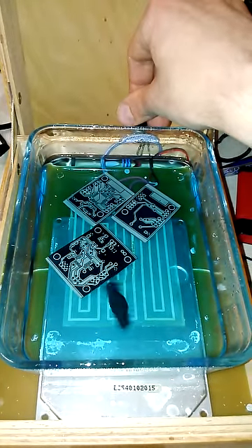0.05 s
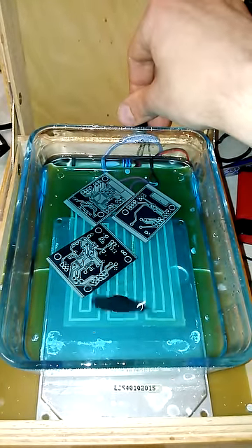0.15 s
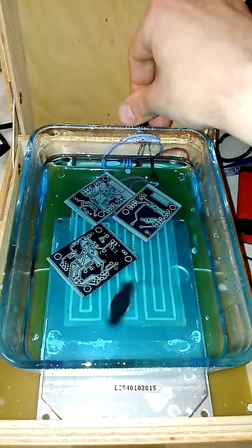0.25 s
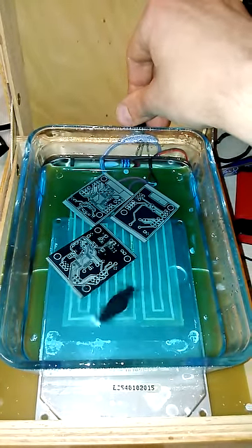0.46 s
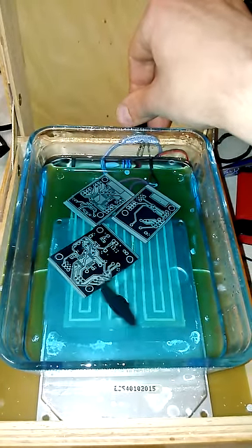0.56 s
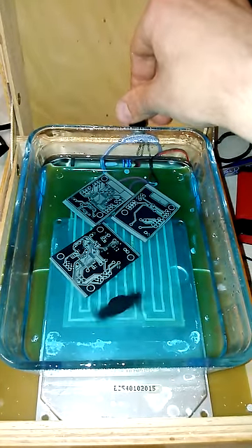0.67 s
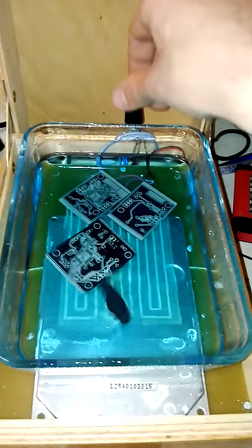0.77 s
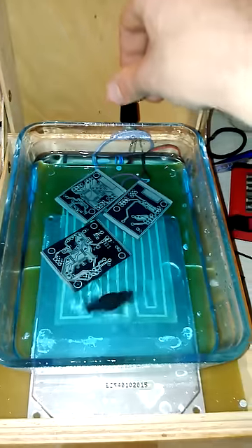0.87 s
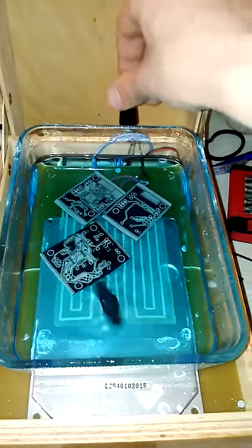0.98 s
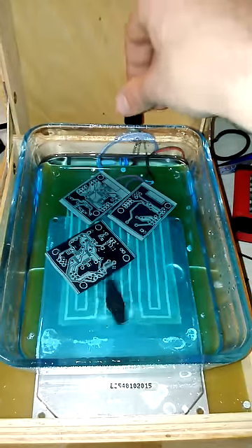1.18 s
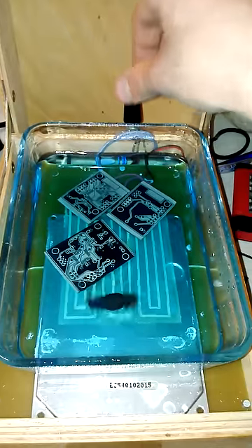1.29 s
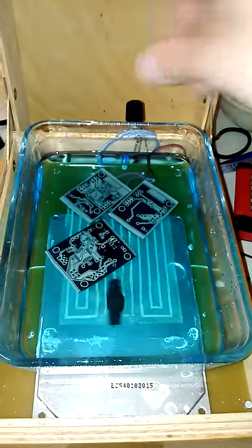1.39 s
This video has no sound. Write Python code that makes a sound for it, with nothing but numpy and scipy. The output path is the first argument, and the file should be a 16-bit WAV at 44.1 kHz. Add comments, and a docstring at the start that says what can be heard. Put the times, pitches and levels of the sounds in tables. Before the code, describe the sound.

A small switch gives a bright, sharp click at 0.2 s, doubled almost instantly, with a brief hollow ring of wooden box and glass dish. A faint drip follows near 0.5 s, a soft dull double touch around 0.7 s, another tiny drip at 0.9 s. At 1.23 s a similar, slightly less bright double click. Quiet motor hum, uneven rumble and steady hiss continue throughout, close and almost mono.

```python
"""A small switch, worked by hand behind a glass dish of liquid in a wooden box, close to the microphone.
Each of its two sharp clicks is a flat-spectrum noise burst, coloured by the switch, that sounds twice
in quick succession; decaying sine modes and noise tails give the short hollow ring of the box.
Between the clicks come a soft bump of two dull noise touches and two faint drips of narrow noise.
Further back lie a low motor hum of wavering sines, a rumble and steady hiss, all almost mono."""
import sys
import numpy as np
from scipy import signal
from scipy.fft import rfft, irfft, next_fast_len
from scipy.io import wavfile
from scipy.ndimage import map_coordinates

SR = 44100
rng = np.random.default_rng(int(sys.argv[2]) if len(sys.argv) > 2 else 0)


def transcribe(signal):
    """Save signal, clipped to [-1, 1], as a 16-bit WAV file at the path in sys.argv[1]."""
    frames = np.atleast_2d(signal).T
    limited = np.clip(frames, -1, 1)
    pcm = np.round(limited * 32767).astype(np.int16)
    wavfile.write(sys.argv[1], SR, pcm)


N = 63945  # length in samples

# Background: lines of the motor hum [f/Hz, mean rms level/dB]
HUM_LINES = [(122.3, -61), (204.6, -73), (1050, -76.5)]
HUM_WAVER_DB, HUM_WAVER_RAD = 1, 0.3  # scale of the random waver in level and phase
# Colour of the hiss [f/Hz, relative level/dB]
HISS_COLOUR = [(80, -15.5), (140, 3), (175, -11.5), (275, -13), (400, -12), (534, -17.5), (637, -11),
               (871, -16.5), (1060, -18), (1400, -14.5), (1690, -20.5), (2300, -18.5), (3290, -22.5),
               (8500, -22), (9200, -16.5), (9800, -26.5), (10350, -16), (11000, -23.5), (15800, -24)]
HISS_DB = -56.5  # rms
# Colour of the low rumble [f/Hz, relative level/dB]
RUMBLE_COLOUR = [(15, -20), (35, 4.5), (60, -12), (100, -3), (150, -17), (260, -30)]
# Rise and fall of the rumble [t/s, rms level/dB]
RUMBLE_LEVELS = [(0.0, -62), (0.144, -73), (0.298, -55), (0.35, -63.5), (0.806, -59), (0.896, -66),
                 (0.98, -56.5), (1.058, -63.5), (1.44, -57.5), (1.45, -68)]

# Faint drips in the dish [t/s, f/Hz, level/dB]
DRIP_EVENTS = [(0.471, 2800, -49), (0.908, 2740, -47.5)]
DRIP_RISE_S, DRIP_T60_S, DRIP_HALF_WIDTH_HZ = 0.0017, 0.04, 260

# Soft touches of the hand on the box [t/s, level/dB]
TOUCH_EVENTS = [(0.664, -53.5), (0.693, -43)]
# Colour of a touch [f/Hz, relative level/dB]
TOUCH_COLOUR = [(150, -26), (390, -3), (520, -11), (660, 2.5), (810, -4), (930, -4), (1150, -11.5),
                (1400, -9), (2500, -22.5), (5000, -45)]
TOUCH_RISE_S, TOUCH_T60_S = 0.0082, 0.17

# Clicks of the switch [t/s, level/dB, length of the snap/s, extra level of the bright ring/dB]
CLICK_EVENTS = [(0.2153, -21, 0.003, 1), (1.2348, -22, 0.003, -6)]
REPEAT_S, REPEAT_DB = 0.0239, -3  # the second, like sounding of each click
# Colour of the snap [f/Hz, relative level/dB]
SNAP_COLOUR = [(200, -27.5), (700, -25), (1350, -11.5), (1800, -24), (2250, -20.5), (2700, -16),
               (3900, -18), (4500, -13), (4900, -5), (5400, -4), (6200, -19), (7600, -12.5), (9100, 1),
               (10900, 2.5), (12500, -9), (14000, -15), (15500, -8.5)]
SNAP_ATTACK_S, SNAP_T60_S = 0.0004, 0.009
BRIGHT_HZ, BRIGHT_WIDTH_HZ = 9820, 570  # the bright ring of the switch
# Modes of box and dish [f/Hz, mean level re click/dB, t60/s, delay/s]
BODY_MODES = [(318.2, -31, 0.39, 0.0075), (359.7, -32, 0.39, 0.0074), (405.2, -31, 0.31, 0.0049),
              (569.5, -32.5, 0.11, 0.016), (628.3, -22, 0.1, 0.017), (739.2, -24.5, 0.15, .005),
              (885, -14.5, 0.063, .003), (919.5, -10, 0.06, .011), (1177, -26.5, 0.045, 0.0051),
              (1413, -25, 0.079, 0.0074), (2206, -18.5, 0.031, 0.0014), (2647, -13, 0.036, 0)]
BODY_RISE_S = 0.0021
# Scattered answer of the near box walls: delay, level re click, decay
WALL_S, WALL_DB, WALL_T60_S = 0.0066, -3.5, 0.017
# Colour of the room tail [f/Hz, relative level/dB]
ROOM_COLOUR = [(150, -18), (300, -7.5), (900, 0.5), (1400, -3), (1800, -14), (2700, -6), (4000, -8.5),
               (5300, -8), (7000, -12.5), (9300, 4.5), (10800, 3), (13000, -8), (15500, -12.5)]
# Decay of the room tail [f/Hz, t60/s]
ROOM_DECAY = [(300, 0.5), (1000, 0.25), (4000, 0.18), (10000, 0.21)]
ROOM_DB, ROOM_RISE_S = -13.5, 0.00088

SIDE_DB = -36.5  # side level of the switch: the image is almost mono
TOP_HZ = 15800  # band limit of the recorder


def amp(db):
    """Decibels to gain."""
    return 10 ** (np.asarray(db) / 20)


def unit(x):
    """Scale to rms 1."""
    return x / np.sqrt(np.mean(x ** 2) + 1e-20)


def along(points, hz):
    """Read [f/Hz, value] points on a log frequency axis."""
    f, v = np.transpose(points)
    return np.interp(np.log(hz + 1), np.log(f + 1), v)


def clock(start=0):
    """Seconds since start, zero before it."""
    return np.maximum(np.arange(N) / SR - start, 0)


def filtered(x, response):
    """Multiply the spectrum of x by a response of frequency."""
    size = next_fast_len(N + SR // 2)  # padded so that tails do not wrap round
    hz = np.fft.rfftfreq(size, 1 / SR)
    return irfft(rfft(x, size) * response(hz), size)[..., :N]


def noise(colour):
    """Noise of rms 1 with the given colour."""
    white = rng.standard_normal(N)
    return unit(filtered(white, lambda hz: amp(along(colour, hz))))


def wobble(rate):
    """A smooth random curve with rate knots a second."""
    return map_coordinates(rng.standard_normal(256), [clock() * rate], mode="mirror")


def swell(t, rise, t60):
    """A rise multiplied by an exponential decay."""
    return (1 - np.exp(-t / rise)) * amp(-60 * t / t60)


def motor_hum():
    """Steady sine lines of a motor, each wavering slightly in level and phase."""
    t = clock()
    hum = np.zeros(N)
    for hz, db in HUM_LINES:
        level = amp(db + HUM_WAVER_DB * wobble(14.42)) * np.sqrt(2)  # rms to peak
        hum += level * np.sin(2 * np.pi * hz * t + HUM_WAVER_RAD * wobble(11.6))
    return hum


def background():
    """Motor hum, low noise that rises and falls as rumble, and broadband noise as steady hiss."""
    rumble_level = amp(np.interp(clock(), *np.transpose(RUMBLE_LEVELS)))
    rumble = rumble_level * noise(RUMBLE_COLOUR)
    hiss = amp(HISS_DB) * noise(HISS_COLOUR)
    return motor_hum() + rumble + hiss


def drips():
    """Tiny pips from the liquid: narrow bands of noise that swell and die quickly."""
    out = np.zeros(N)
    for start, pitch_hz, db in DRIP_EVENTS:
        band = lambda hz: 1 / (1 + ((hz - pitch_hz) / DRIP_HALF_WIDTH_HZ) ** 4)
        pip = unit(filtered(rng.standard_normal(N), band))
        out += amp(db) * pip * swell(clock(start), DRIP_RISE_S, DRIP_T60_S)
    return out


def touches():
    """Dull touches of the hand on the box: coloured noise with a soft rise and a decay."""
    out = np.zeros(N)
    for start, db in TOUCH_EVENTS:
        out += amp(db) * noise(TOUCH_COLOUR) * swell(clock(start), TOUCH_RISE_S, TOUCH_T60_S)
    return out


def room(start):
    """The near walls answer with scattered noise, over a short tail that dies band by band."""
    hz, s, bands = signal.stft(noise(ROOM_COLOUR), SR, nperseg=256)
    t60 = along(ROOM_DECAY, hz)[:, None]
    fade = amp(-60 * np.maximum(s - start, 0) / t60)
    tail = signal.istft(bands * fade, SR, nperseg=256)[1][:N]
    tail = tail * (1 - np.exp(-clock(start) / ROOM_RISE_S))
    walls = noise(SNAP_COLOUR) * swell(clock(start + WALL_S), SNAP_ATTACK_S, WALL_T60_S)
    return amp(ROOM_DB) * tail + amp(WALL_DB) * walls


def body(start):
    """The hollow modes of box and dish: sines that come in at their own delays and die."""
    t = clock(start)
    ring = np.zeros(N)
    for hz, db, t60, delay in BODY_MODES:
        level = amp(db + rng.normal(0, 1))  # each strike excites the modes a little differently
        envelope = swell(clock(start + delay), BODY_RISE_S, t60)
        ring += level * envelope * np.sin(2 * np.pi * (hz * t + rng.random()))
    return ring


def snap(start, length, bright_db):
    """A tight rattle of contact, even in spectrum, coloured by the resonances of the switch."""
    t = clock(start)
    shape = np.minimum(t / SNAP_ATTACK_S, 1) * amp(-60 * np.maximum(t - length, 0) / SNAP_T60_S)
    burst = shape * rng.standard_normal(N)
    # keep only the phases, so every frequency is equally strong, then shape once more
    even = irfft(np.exp(1j * np.angle(rfft(burst))), N)
    burst = np.sqrt(shape) * even

    def colour(hz):
        bright = bright_db * np.exp(-((hz - BRIGHT_HZ) / BRIGHT_WIDTH_HZ) ** 2)
        return amp(along(SNAP_COLOUR, hz) + bright)

    return unit(filtered(burst, colour)) * np.sqrt(np.mean(shape ** 2))


def switch():
    """Each click is snap, ring and room together, and the same again a moment later."""
    once = np.zeros(N)
    for start, db, length, bright_db in CLICK_EVENTS:
        once += amp(db) * (snap(start, length, bright_db) + body(start) + room(start))
    return filtered(once, lambda hz: 1 + amp(REPEAT_DB) * np.exp(-2j * np.pi * hz * REPEAT_S))


def scene():
    """Everything sits in the middle; a second random draw of the switch adds a trace of width."""
    mid = background() + drips() + touches() + switch()
    side = amp(SIDE_DB) * switch()
    return np.array([mid + side, mid - side])


def record(dry):
    """The recorder cuts steeply above its band limit."""
    return filtered(dry, lambda hz: 1 / (1 + (hz / TOP_HZ) ** 160))


dry = scene()
out = record(dry)
transcribe(out)
```